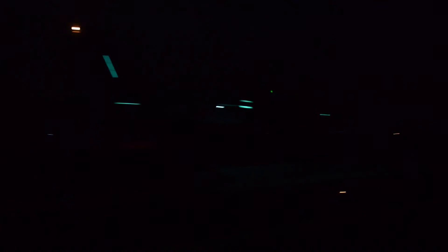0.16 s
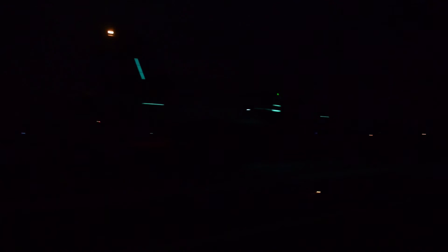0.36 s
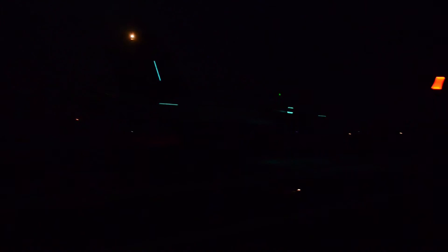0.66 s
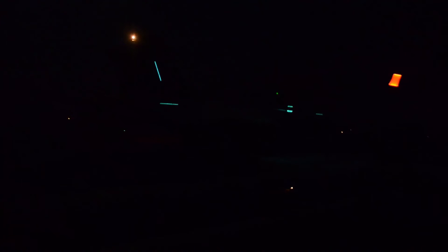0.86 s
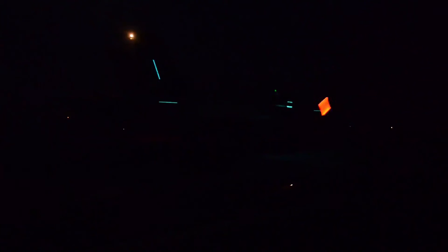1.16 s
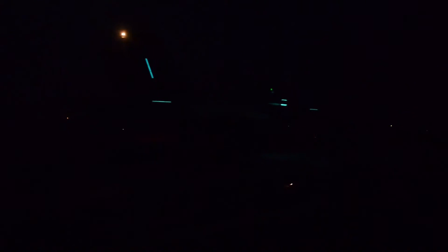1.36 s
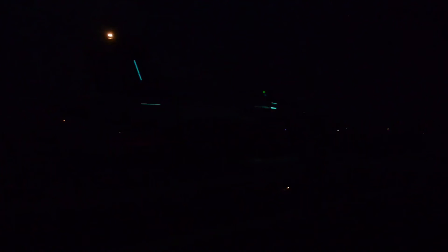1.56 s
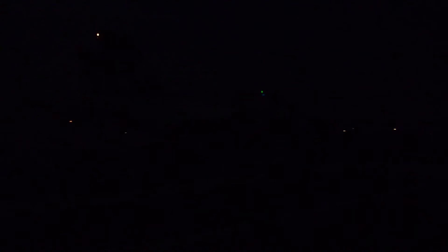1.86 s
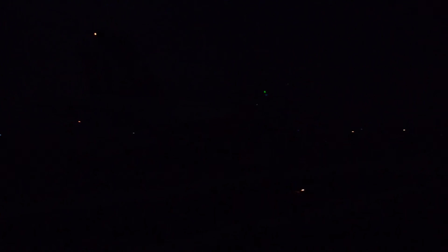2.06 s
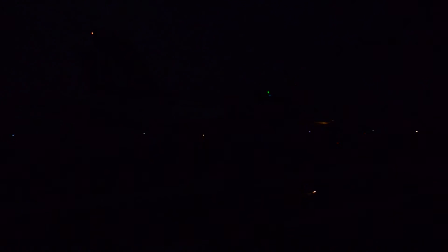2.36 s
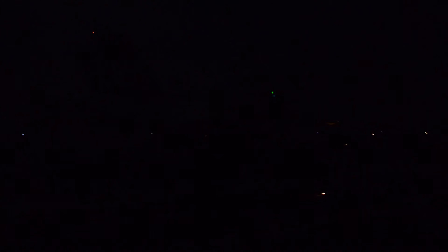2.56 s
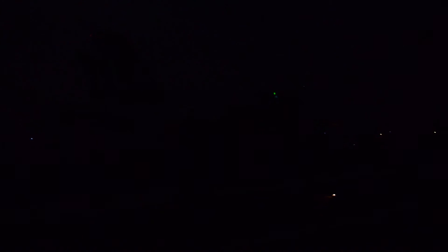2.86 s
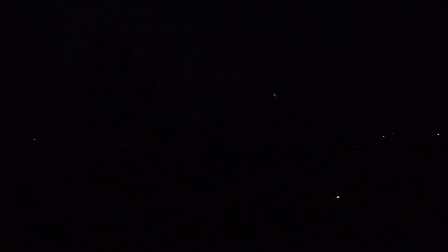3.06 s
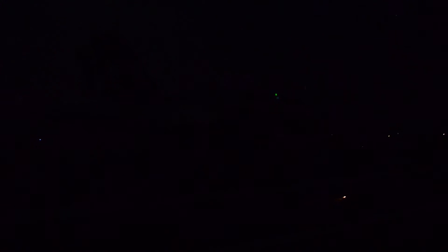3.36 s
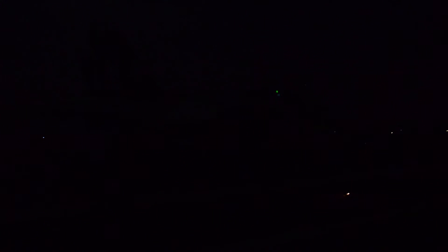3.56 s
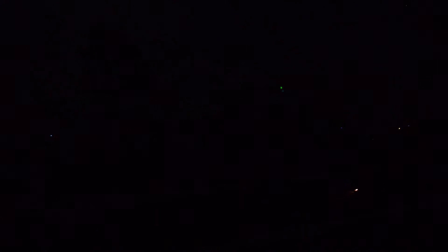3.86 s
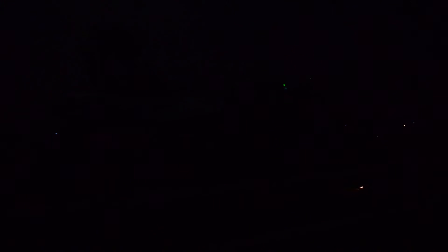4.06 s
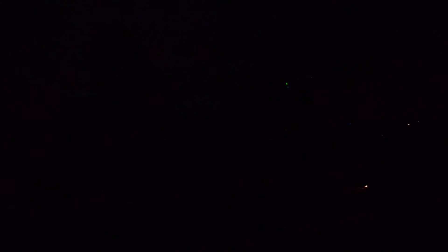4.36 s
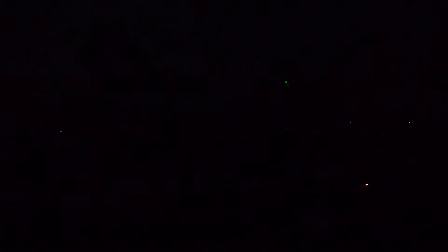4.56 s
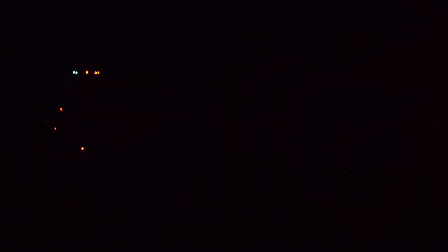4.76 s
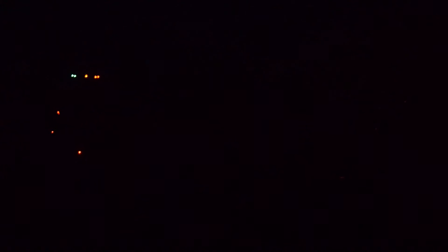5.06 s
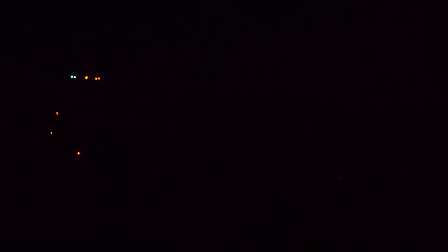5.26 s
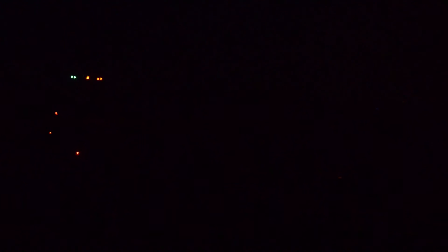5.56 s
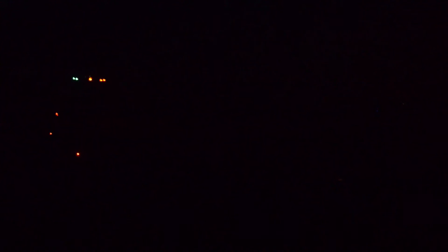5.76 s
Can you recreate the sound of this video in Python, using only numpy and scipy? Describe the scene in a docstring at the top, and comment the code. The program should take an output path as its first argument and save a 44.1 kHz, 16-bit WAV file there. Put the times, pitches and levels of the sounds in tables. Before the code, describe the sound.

A jet lands on a ship's flight deck, so close that its roar overloads the microphone. The intake howls past, then the roar darkens to a rumble and fades as the jet rolls away, a high turbine whine slowly sinking. An abrupt cut brings a much quieter parked jet, idling with a steady rush and a thin, throbbing whine. Faint wind rumbles on the microphone underneath.

```python
"""The roar of a landing jet, so close that the microphone overloads, on a carrier deck at night.
The intake fan howls past; the roar darkens as the tailpipe turns toward us and the steel deck echoes it.
As the jet rolls away, its turbine slows and the whine sinks. Wind rumbles on the microphone throughout.
Then, abruptly, a parked jet idles: two engines beat against each other under a thin, wavering whine."""
import sys
import numpy as np
from scipy import signal
from scipy.fft import rfft, irfft, next_fast_len
from scipy.io import wavfile
from scipy.ndimage import uniform_filter1d

SR = 44100
rng = np.random.default_rng(int(sys.argv[2]) if len(sys.argv) > 2 else 0)


def output_pcm(signal):
    """Save a mono or channel-first signal as 16-bit PCM at the path in sys.argv[1].

    Samples are clipped to [-1, 1] before scaling.
    """
    pcm = np.clip(np.atleast_2d(signal).T, -1, 1) * 32767
    wavfile.write(sys.argv[1], SR, np.round(pcm).astype(np.int16))


N = 261072
HOP = 256  # samples between spectral frames
TIME = np.arange(N) / SR
FRAME_TIME = np.arange(N // HOP + 5) * HOP / SR
BIN_HZ = np.fft.rfftfreq(4 * HOP, 1 / SR)


def amp(db):
    """Decibels to gain."""
    return 10 ** (np.asarray(db) / 20)


def unit_rms(x):
    """Scales to rms 1."""
    return x / np.sqrt(np.mean(abs(x) ** 2) + 1e-20)


def ramp(start_s, end_s, t=TIME):
    """Rises evenly from 0 to 1 between two moments."""
    return np.clip((t - start_s) / (end_s - start_s), 0, 1)


def bell(peak_s, half_s):
    """A smooth rise to 1 and fall around one moment."""
    return np.exp(-((TIME - peak_s) / half_s) ** 2)


def swells(rows):
    """A gain made of bell-shaped swells."""
    return sum(amp(db) * bell(peak_s, half_s) for peak_s, half_s, db in rows)


def spectrum_db(points, hz=BIN_HZ):
    """Joins the points of a spectrum by straight lines over log frequency."""
    point_hz, db = np.transpose(points)
    return np.interp(np.log(hz + 1), np.log(point_hz + 1), db)


def drift(rate_hz):
    """Slow random motion of rms 1."""
    frames = len(FRAME_TIME)
    hz = np.fft.rfftfreq(frames, HOP / SR)
    slow = irfft(rfft(rng.standard_normal(frames)) / np.hypot(1, (hz / rate_hz) ** 2), frames)
    return np.interp(TIME, FRAME_TIME, unit_rms(slow))


def turbulence(shape, patchy_db):
    """Noise of steady power whose spectrum follows shape, mottled by eddies."""
    field = rng.standard_normal((len(FRAME_TIME), len(BIN_HZ)))
    eddies = unit_rms(uniform_filter1d(uniform_filter1d(field, 12, axis=0), 30, axis=1))
    shape = shape * amp(patchy_db * eddies)
    shape = shape / np.linalg.norm(shape, axis=1, keepdims=True)
    spectra = shape * (rng.standard_normal(shape.shape) + 1j * rng.standard_normal(shape.shape))
    _, noise = signal.istft(spectra.T, nperseg=4 * HOP, noverlap=3 * HOP)
    return unit_rms(noise[:N])


def whistle(hz, width_hz):
    """A narrow band of noise riding on a pitch curve."""
    pole = np.exp(-np.pi * width_hz * np.sqrt(2) / SR)
    noise = rng.standard_normal(N) + 1j * rng.standard_normal(N)
    flutter = signal.lfilter([1], [1, -2 * pole, pole * pole], noise)
    phase = 2 * np.pi * np.cumsum(hz * np.ones(N)) / SR
    return unit_rms((flutter * np.exp(1j * phase)).real)


def tone(hz, width_hz):
    """A sine whose phase wanders enough to give the line its width."""
    wander = np.sqrt(2 * np.pi * width_hz / SR) * rng.standard_normal(N)
    return np.sqrt(2) * np.sin(np.cumsum(2 * np.pi * hz / SR + uniform_filter1d(wander, size=200)))


def share_below(edge_hz, order=8):
    """Share of the power that lies under a crossover."""
    return 1 / (1 + (BIN_HZ / edge_hz) ** order)


# wind right on the microphone: f/Hz, relative level/dB
WIND_SPECTRUM = [(20, 6), (65, 8), (85, 1), (130, -20), (400, -36), (2000, -90)]
# gusts that buffet it: t/s, half length/s, level/dB
WIND_GUSTS = [(4.47, .05, -36), (5.09, 0.05, -33)]


def wind(steady_db):
    """Wind over the open deck rumbles on the microphone, with a few gusts."""
    strength = amp(steady_db) + swells(WIND_GUSTS)
    return strength * turbulence(amp(spectrum_db(WIND_SPECTRUM)), patchy_db=-6.0)


def beating_whine(hz=1945, db=-42.8, beat_hz=6.2, in_step_s=4.86, second_engine_gain=0.45):
    """Two engines run at nearly the same speed, so their common tone throbs."""
    beat = abs(1 + second_engine_gain * np.exp(2j * np.pi * beat_hz * (TIME - in_step_s)))
    return amp(db) * beat * tone(hz, width_hz=2.0)


# rush of the engines idling on deck: f/Hz, relative level/dB
IDLE_SPECTRUM = [(60, -12), (120, -8), (200, -3), (400, -9.5), (700, -6), (900, -3.5), (1350, -7.5),
                 (1700, -2.5), (2400, -6.5), (3400, -11.5), (4400, -15.5), (6300, -15.5), (10500, -16),
                 (14500, -24.5)]
# overtones of their compressor blades: f/Hz, width/Hz, level/dB
BLADE_OVERTONES = [(2860, 55, -50.5), (4860, 96, -46.5), (5880, 140, -49.5), (6800, 190, -54),
                   (7790, 290, -49.5), (8760, 320, -52), (9700, 350, -55), (10720, 380, -56)]
# their lesser tones, steady in pitch: f/Hz, width/Hz, level/dB
ENGINE_TONES = [(550, 7.5, -55), (842, 36, -48), (940, 22.5, -50), (2150, 12, -58), (3880, 12.3, -54.5)]


def parked_jet(rush_db=-34, waver=0.004, flutter_db=1.8):
    """Idle rush, the engines' fluttering tones, and blade overtones that waver with rotor speed."""
    rush = amp(rush_db) * turbulence(amp(spectrum_db(IDLE_SPECTRUM)), patchy_db=1.0)
    speed = 1 + waver * drift(rate_hz=14)
    blades = sum(amp(db) * whistle(hz * speed, width) for hz, width, db in BLADE_OVERTONES)
    tones = beating_whine() + sum(amp(db) * tone(hz, width) for hz, width, db in ENGINE_TONES)
    return rush + blades + tones * amp(flutter_db * drift(rate_hz=29))


# flares and dips in the treble of the receding jet: t/s, half length/s, level change/dB
TREBLE_FLARES = [(2.48, 0.064, 1), (2.72, 0.059, -3), (3.068, 0.053, -3.5), (3.633, 0.036, 2.5),
                 (3.77, .04, 1.5), (4.14, .035, 1), (4.64, 0.088, -2)]


def flare_db():
    """Brief level changes shared by hiss and haze; the whine follows them more strongly."""
    return sum(db * bell(peak_s, half_s) for peak_s, half_s, db in TREBLE_FLARES)


# swells of the fan tone from farther down the deck: t/s, half length/s, level/dB
FAN_SWELLS = [(4.27, 0.067, -46), (4.51, 0.17, -47.5)]


def spool_down(start_s=2.3, fade_in_s=1.3, start_hz=9560, slowing_s=7.55, fan_ratio=.446, haze_ratio=1.55):
    """Turbine and fan tones sink as the rotor slows; a higher blade row adds a breathy haze."""
    hz = start_hz * np.exp(-(TIME - start_s) / slowing_s)
    hz = hz * (1 + 0.00145 * drift(rate_hz=13.7))
    whine_db = -48 + 3.1 * flare_db() + 4.0 * drift(rate_hz=14)
    turbine = amp(whine_db) * tone(hz, width_hz=73)
    fan = swells(FAN_SWELLS) * whistle(hz * fan_ratio, width_hz=60)
    haze_gain = amp(-47 + flare_db()) * bell(peak_s=4.05, half_s=0.7)
    haze = haze_gain * whistle(hz * haze_ratio, width_hz=1800)
    return (turbine + fan + haze) * ramp(start_s, start_s + fade_in_s)


# swells of the intake howl at close range: t/s, half length/s, level/dB
INTAKE_SWELLS = [(.72, .42, -17.5), (1.76, 0.081, -18.5)]


def intake_howl(start_hz=1918, sink_hz_per_s=80):
    """The fan howls through the roar, its pitch falling as the jet passes the microphone."""
    return swells(INTAKE_SWELLS) * whistle(start_hz - sink_hz_per_s * TIME, width_hz=150)


ABEAM_FROM_S, ABEAM_UNTIL_S, TAIL_FROM_S = 0.51, 1.1, 2.09


def facing(t):
    """Shares of nose, side and tail that the jet shows the microphone, one row per moment."""
    nose = 1 - ramp(0, ABEAM_FROM_S, t)
    tail = ramp(ABEAM_UNTIL_S, TAIL_FROM_S, t)
    return np.transpose([nose, 1 - nose - tail, tail])


def deck_echo(near_gain=0.11, far_gain=0.47, near_delay_s=0.001, far_delay_s=0.00126, fade_hz=1400):
    """With distance the sound skims the steel deck, and its echo cuts deeper notches in the spectrum."""
    grazing = ramp(2.36, 2.37, FRAME_TIME)[:, None]
    gain = near_gain + (far_gain - near_gain) * grazing
    delay_s = near_delay_s + (far_delay_s - near_delay_s) * grazing
    treble_loss = np.exp(-BIN_HZ / fade_hz)  # the rough deck reflects the treble less cleanly
    return abs(1 + gain * treble_loss * np.exp(-2j * np.pi * BIN_HZ * delay_s))


# the body of the roar, close by and then rolling away: t/s, level/dB
ROAR_LEVEL = [(0, -8.4), (1.2, -9.5), (1.72, -10.5), (2.15, -13.5), (2.55, -18.6), (2.76, -22.6),
              (3.75, -30.5), (4.5, -39.5), (4.72, -39.5)]
# the roar from ahead, from the side and from behind: f/Hz, relative level/dB
NOSE_SPECTRUM = [(140, -10), (250, -4), (550, -4), (950, 3.5), (1450, 0), (2000, 0.5), (3000, -2),
                 (4800, -14), (8000, -23), (10000, -18), (14500, -21.5)]
SIDE_SPECTRUM = [(140, -7.5), (400, -3), (900, -2), (1400, -0.5), (2100, 1.5), (3200, 0), (4800, -4.5),
                 (6500, -3), (10000, -6.5), (14500, -8)]
TAIL_SPECTRUM = [(60, -6), (160, 4), (320, -0.5), (450, -6.5), (580, -1), (1000, -5), (1600, -4.5),
                 (2100, -5), (2900, -8.5), (4900, -12.5), (6500, -9), (9500, -13), (14500, -18)]
# balance against the body, rows for nose, side and tail: hiss level/dB, rumble level/dB
BALANCE_BY_SIDE = [(-6, -16.5), (0.04, -17.5), (-8, -11.5)]


def exhaust_roar(rumble_hz=400, hiss_hz=4500, plume_lag_s=0.25, hiss_db_per_s=1.7, rumble_db_per_s=2.94):
    """Jet mixing noise: large eddies rumble, fine ones hiss, and the colour turns as the jet passes."""
    spectra_db = np.array([spectrum_db(side) for side in (NOSE_SPECTRUM, SIDE_SPECTRUM, TAIL_SPECTRUM)])
    colour = amp(facing(FRAME_TIME) @ spectra_db) * deck_echo()
    low, not_high = share_below(rumble_hz), share_below(hiss_hz)
    roar_db = np.interp(TIME, *np.transpose(ROAR_LEVEL))
    hiss_by_side, rumble_by_side = np.transpose(BALANCE_BY_SIDE)
    # behind the jet, hiss and rumble die more slowly than the body
    away_s = np.maximum(TIME - TAIL_FROM_S, 0)
    hiss_db = facing(TIME) @ hiss_by_side + hiss_db_per_s * away_s + flare_db()
    hiss_db += 0.9 * drift(rate_hz=22)  # hot, moving air makes the treble waver
    # the large eddies lie far down the plume, so they pass us later than the jet
    rumble_db = facing(TIME - plume_lag_s) @ rumble_by_side + rumble_db_per_s * away_s
    rumble_db += 2.5 * bell(peak_s=2.3, half_s=0.4)  # the exhaust sweeps past the microphone
    rumble = amp(rumble_db) * turbulence(colour * np.sqrt(low), patchy_db=5.5)
    body = turbulence(colour * np.sqrt(not_high - low + 1e-12), patchy_db=0.63)
    hiss = amp(hiss_db) * turbulence(colour * np.sqrt(1 - not_high), patchy_db=0.8)
    return amp(roar_db) * (rumble + body + hiss)


def scene(idle_start_s=4.734):
    """The landing gives way at once to the parked jet; both channels are alike."""
    landing = exhaust_roar() + intake_howl() + spool_down() + wind(steady_db=-46)
    idling = parked_jet() + wind(steady_db=-54)
    parked = ramp(idle_start_s, idle_start_s + 0.0026)
    sound = (1 - parked) * landing + parked * idling
    return np.array([sound, sound])


# response of the microphone on deck: f/Hz, level/dB
MIC_RESPONSE = [(10, -44), (20, -32), (40, -17), (70, -10), (140, -0.5), (9500, 0.5), (12000, -2.5),
                (15000, -10.5)]


def record(dry, ceiling=0.46, bias=0.16, edge_hz=15180):
    """The microphone saturates, a little lopsidedly, then colours the sound; last the band limit."""
    oversampled = signal.resample_poly(dry, 2, 1, axis=1)
    squashed = ceiling * (np.tanh(oversampled / ceiling + bias) - np.tanh(bias))
    sound = signal.resample_poly(squashed, 1, 2, axis=1)
    size = next_fast_len(N + SR // 2)
    response = amp(spectrum_db(MIC_RESPONSE, np.fft.rfftfreq(size, 1 / SR)))
    coloured = irfft(rfft(sound, size) * response, size)[:, :N]
    lowpass = signal.firwin(801, edge_hz, window=("kaiser", 9), fs=SR)
    return signal.oaconvolve(coloured, lowpass[None], "same")


dry = scene()
out = record(dry)
output_pcm(out)
```